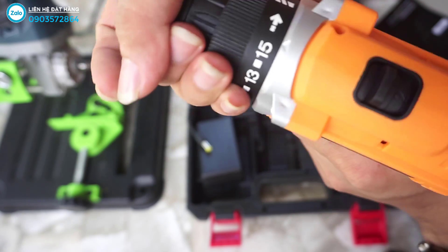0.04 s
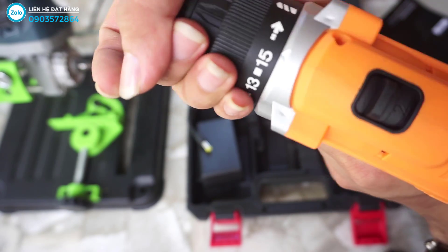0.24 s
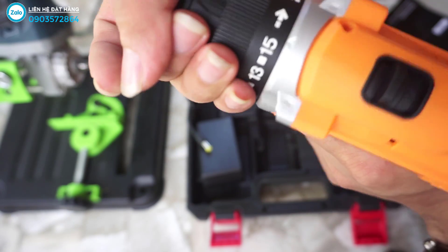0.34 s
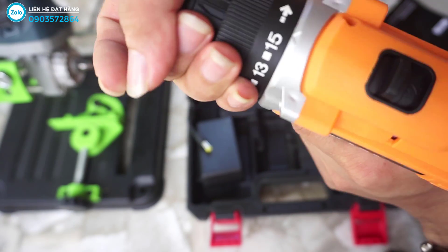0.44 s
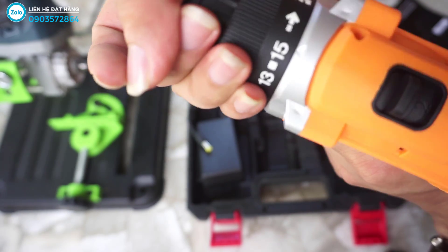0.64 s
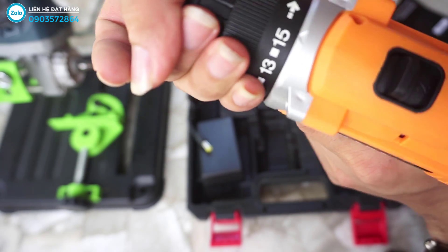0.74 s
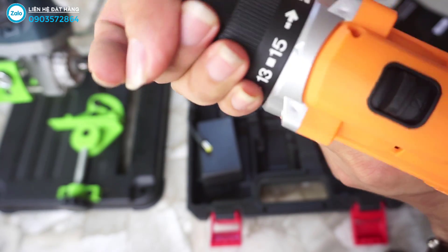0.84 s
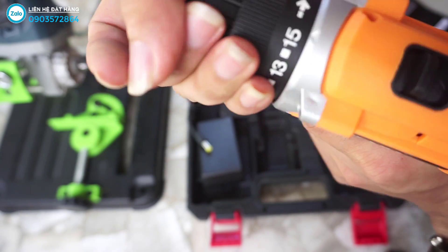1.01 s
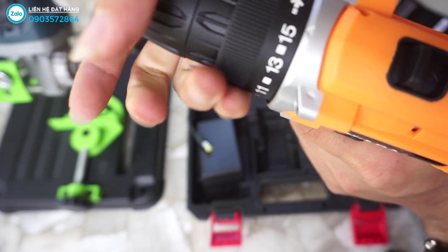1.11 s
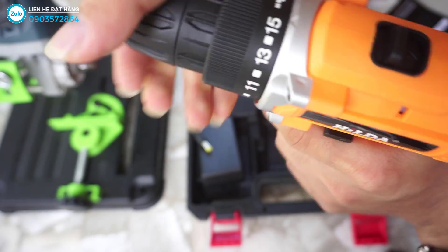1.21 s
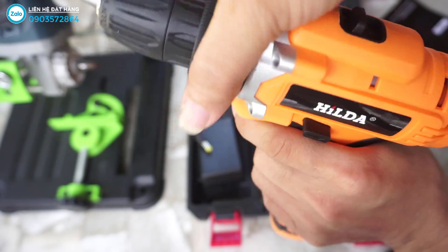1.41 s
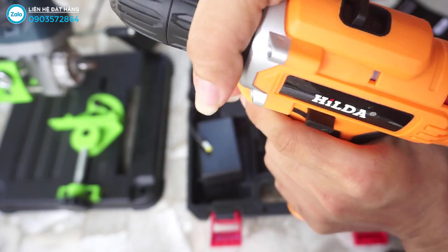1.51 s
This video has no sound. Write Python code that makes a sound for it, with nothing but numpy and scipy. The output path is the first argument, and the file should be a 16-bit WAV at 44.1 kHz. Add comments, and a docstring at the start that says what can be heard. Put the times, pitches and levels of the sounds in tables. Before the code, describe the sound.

Three brief bursts from a half-stalled cordless drill, squealing and clicking close by.

```python
"""A cordless drill, close to a stereo microphone in a small room and a little to the right,
is nudged three times while a hand grips its chuck. The half-stalled motor squeals at its switching
rate, the gears grind and knock, the brushes hiss and the clutch snaps. On the third pull the motor
briefly spins up with a gear whine and stops. Then the hand shifts its grip with a faint rustle and
ticks of plastic. Behind the drill lie a short room tail, quiet air and a low hum."""
import sys
import numpy as np
from scipy import signal
from scipy.fft import rfft, irfft, next_fast_len
from scipy.io import wavfile
from scipy.ndimage import uniform_filter1d, map_coordinates

SR = 44100
rng = np.random.default_rng(int(sys.argv[2]) if len(sys.argv) > 2 else 0)


def wav_record(signal):
    """Record a signal, one row per channel, as 16-bit PCM in the file named by sys.argv[1]."""
    frames = np.transpose(np.atleast_2d(signal))
    bounded = np.clip(frames, -1, 1)
    # unit amplitude maps onto the largest positive 16-bit level
    quanta = np.round(bounded * 32767).astype(np.int16)
    wavfile.write(sys.argv[1], SR, quanta)


N = 68355

# Colour of the room air. Each row: frequency in Hz, relative level in dB.
AIR_SPECTRUM = [(25, -26.5), (80, -28), (150, -14), (240, -16), (320, -8), (390, -6.5), (450, -11.5),
                (650, -10.5), (1100, -18.5), (1800, -18), (2700, -18.5), (3000, -13.5), (3500, -22),
                (4500, -23), (11000, -32.5)]
# The air sinks at the end. Each row: time in seconds, level in dB.
AIR_LEVELS = [(1.0, -52), (1.15, -57.5)]
# Low hum in the room. Each row: frequency in Hz, level in dB.
HUM_TONES = [(156, -73), (392, -64)]
# How alike noise is on both sides of the microphone. Each row: frequency in Hz, correlation.
STEREO_LIKENESS = [(60, 0.9), (350, 0.87), (2000, 0.32), (4800, 0.057), (10000, 0.022)]
# The room's tail. Each row: frequency in Hz, seconds to fall 60 dB.
ROOM_DECAY = [(200, 0.51), (1500, 0.34), (4000, 0.23), (10000, 0.22)]
# Plastic ticking under the fingers. Each row: start in seconds, level in dB, pitch in Hz,
# seconds for the crack to fall 60 dB.
GRIP_TICKS = [(.0553, -35.5, 7540, 0.035), (.4338, -35, 7800, 0.015), (1.0735, -33, 5860, 0.011),
              (1.0938, -35.5, 4400, 0.023), (1.139, -41, 7240, 0.0091), (1.1595, -38, 9700, 0.024),
              (1.184, -41, 2350, 0.044), (1.1895, -35.5, 2110, 0.015), (1.2, -41.5, 2230, 0.029),
              (1.207, -35.5, 2420, 0.012)]
# Hard clutch snaps. Each row reads as for the grip ticks.
CLUTCH_SNAPS = [(.2183, -16, 4540, 0.0019), (.2193, -18, 2090, 0.0093), (.32, -14, 4900, 0.0039),
                (.3103, -18.5, 10400, 0.0031), (.3478, -20, 6030, 0.0017), (.6228, -23.5, 5160, 0.0066),
                (.6406, -12, 5705, 0.0019), (.873, -20.5, 4714, 0.0074)]
# Resonances of the gearbox. Each row: frequency in Hz, level in dB, seconds to fall 60 dB.
GEARBOX_MODES = [(720, -5, .026), (990, -3, .022), (1470, -8, .011)]
# Gear teeth knocking. Each row: start in seconds, level in dB.
TOOTH_KNOCKS = [(.0099, -31), (.0161, -32), (.0212, -34), (.0271, -33), (.0321, -33), (.052, -33),
                (.1968, -31), (.2188, -18), (.2312, -22), (.238, -29), (.2467, -25), (.2557, -30),
                (.2688, -29), (.2997, -24), (.3126, -28), (.32, -26), (.3271, -29), (.3533, -23),
                (.3925, -30), (.3982, -26), (.4031, -29), (.535, -25), (.5451, -27), (.5536, -31),
                (.564, -28), (.5737, -27), (.5842, -28), (.5939, -31), (.5998, -29), (.6096, -23),
                (.6339, -21), (.645, -18), (.6522, -20), (.6592, -22), (.6661, -22), (.6719, -21),
                (.6776, -19), (.683, -18), (.6877, -20), (.6959, -27), (.705, -23), (.7151, -27),
                (.7207, -30), (.7251, -30), (.7317, -29), (.8291, -29), (.8538, -28), (.8623, -23),
                (.867, -18), (.8745, -18), (.8814, -19), (.8859, -15)]
# Hollow jolts as the gear train takes up its load. Each row: start in seconds, level in dB.
LOAD_JOLTS = [(0.2205, -25.5), (0.5345, -26.5)]
# The drive's grinding and hiss, then, from 1 s on, faint rustle as the hand shifts its grip.
# Each row: time in seconds, coarse noise in dB, fine noise in dB.
DRIVE_AND_RUSTLE_LEVELS = [(0, -38.5, -53), (.03, -37.5, -40.5), (.085, -58.5, -67), (.193, -64, -96),
                           (.198, -41.5, -99), (.225, -34, -44), (.28, -47, -62), (.31, -36, -36),
                           (.337, -57, -76), (.402, -35, -38.5), (.45, -67, -62.5), (.526, -62, -60),
                           (.532, -42, -36.5), (.595, -37.5, -62), (.635, -38, -36), (.685, -31.5, -32),
                           (.71, -38.5, -45), (.74, -41, -45), (.775, -67, -87), (.826, -54, -71),
                           (.83, -43, -33.5), (.858, -31.5, -57), (.875, -26.5, -23), (.91, -25, -29),
                           (.935, -28, -23.5), (.966, -26.5, -25.5), (.985, -38, -33), (1.0, -50, -51),
                           (1.1, -58.5, -58), (1.275, -65.5, -55.5), (1.31, -70, -67), (1.5, -82, -65),
                           (1.53, -66.5, -58)]
# Colours of the coarse and the fine noise. Each row: frequency in Hz, relative level in dB.
COARSE_SPECTRUM = [(100, -56), (300, -19), (500, -16.5), (680, -5.5), (1000, -3), (1550, -0.5),
                   (2300, -7.5), (2750, -8.5), (3200, 2.5), (4000, -10.5), (8000, -18.5)]
FINE_SPECTRUM = [(1000, -7), (3000, 0), (4400, 2.5), (5500, 0.5), (7000, 0), (8200, 0), (10000, 3.5),
                 (11200, -2.5)]
# The spin-up and stop. Each row: time in seconds, gear mesh rate in Hz, whine level in dB.
SPIN_UP = [(.878, 400, -48), (.89, 500, -37), (.9, 600, -36), (.911, 725, -29.5), (.922, 820, -33),
           (.935, 875, -34), (.952, 908, -39), (.962, 835, -36.5), (.97, 690, -38), (.984, 350, -46),
           (.993, 200, -60)]
# Harmonics of the mesh rate, from the first upward. Each entry: relative level in dB.
MESH_HARMONICS = [-15, -12, -1.5, -20, 2, -23]
# How the case passes the whine. Each row: frequency in Hz, gain in dB.
CASE_RESPONSE = [(400, -16), (700, 9), (1200, 8), (1650, 7), (2300, 6), (2750, -4), (3700, -18), (4400, -1),
                 (5600, -22)]
# Trigger pulls. Each row: press in seconds, release in seconds.
TRIGGER_PULLS = [(.1967, .383), (.5297, .704), (.8287, .9)]
# The squeal jumps as the rotor creeps on. Each row: start in seconds, pitch in Hz, level in dB.
ROTOR_STEPS = [(.19, 3171, -29.5), (.221, 3260, -40), (0.237, 3057, -30), (0.244, 3301, -33),
               (0.275, 3030, -27), (0.29, 3317, -33), (.355, 3003, -31.5), (0.361, 3210, -35.5),
               (0.374, 3170, -33), (0.552, 3310, -32), (.561, 3092, -27.5), (.566, 3300, -33),
               (0.579, 3030, -25), (.585, 3315, -30), (.606, 2960, -26), (.633, 3230, -31.5),
               (0.653, 2986, -31), (0.681, 3230, -34.5), (0.821, 3165, -30.5), (0.843, 3320, -37),
               (.848, 3104, -31), (0.854, 3283, -30.5), (0.865, 2990, -23), (0.869, 3322, -37),
               (0.878, 2960, -24), (0.886, 3282, -40)]
# How the motor housing passes the squeal's partials. Each row: frequency in Hz, gain in dB.
HOUSING_RESPONSE = [(3500, 2), (5900, -16), (6300, -18), (6650, -14), (9000, -23), (9500, -15.5),
                    (10000, -17.5)]


def amp(db):
    """Decibels to gain."""
    return 10 ** (np.asarray(db) / 20)


def pan(db):
    """Left and right gains for a left-minus-right level; negative sits to the right."""
    return amp(np.array([[db], [-db]]) / 2)


def along(points, hz):
    """Read (Hz, value) points at hz, on a log frequency axis."""
    freqs, values = np.transpose(points)
    return np.interp(np.log(hz + 1), np.log(freqs + 1), values)


def curves(rows):
    """One value per sample for each column after the time."""
    times, *columns = np.transpose(rows)
    return [np.interp(np.arange(N) / SR, np.sort(times), column) for column in columns]


def wobble(rate):
    """A smooth random curve, rate knots a second."""
    return map_coordinates(rng.standard_normal(N // 10), [np.arange(N) * rate / SR], mode="wrap")


def filtered(x, response):
    """Shape x with a gain that is a function of frequency."""
    size = next_fast_len(N + SR // 2)
    return irfft(rfft(x, size) * response(np.fft.rfftfreq(size, 1 / SR)), size)[..., :N]


def add(track, start, sound):
    """Mix a sound into the track, start seconds in."""
    part = track[..., round(start * SR):][..., :sound.shape[-1]]
    part += sound[..., :part.shape[-1]]


def rush(spectrum, envelope=1):
    """Coloured stereo noise of rms 1, nearly mono in the bass."""
    def mid_side_gains(hz):
        spread = np.arccos(np.clip(along(STEREO_LIKENESS, hz), -1, 1)) / 2
        return amp(along(spectrum, hz)) * [np.cos(spread), np.sin(spread)]

    mid, side = filtered(rng.standard_normal((2, N)) * envelope, mid_side_gains)
    stereo = np.array([mid + side, mid - side])
    return stereo / np.sqrt(np.mean(stereo ** 2) + 1e-20)


def grains(rate, life_s, bed):
    """Envelope of unevenly spaced tiny contacts on a steady bed."""
    count = np.floor(np.cumsum(rate * np.exp(.5 * wobble(rate))) / SR)
    hits = np.diff(count, prepend=0) * rng.uniform(.9, 1, N)
    return bed + signal.lfilter([1], [1, -np.exp(-1 / (life_s * SR))], hits)


def clicks(rows, ring_ratio, crack_db, crack_low_hz):
    """Dry clicks: a crack of noise and a ring that lasts ring_ratio times as long."""
    out, t = np.zeros((2, N)), np.arange(SR // 30) / SR
    highpass = signal.butter(2, crack_low_hz, "high", fs=SR)
    for start, db, hz, t60 in rows:
        noise = rng.standard_normal(len(t)) + .5 * rng.standard_normal((2, len(t)))
        crack = signal.lfilter(*highpass, noise * amp(crack_db - 60 * t / t60))
        ring = np.sin(2 * np.pi * hz * t) * amp(-60 * t / (ring_ratio * t60))
        add(out, start, amp(db) * (ring + crack))
    return out


def room_tone():
    """Quiet air all round the microphone, with a low hum in the middle."""
    t = np.arange(N) / SR
    air_db, = curves(AIR_LEVELS)
    hum = sum(amp(db) * np.sqrt(2) * np.sin(2 * np.pi * hz * t + .5 * wobble(10.63))
              for hz, db in HUM_TONES)
    return amp(air_db) * rush(AIR_SPECTRUM) + hum


def room_tail(source):
    """The walls of the small room return a short tail; the treble dies first."""
    hz, t, noise = signal.stft(rng.standard_normal((2, SR // 2)), SR, nperseg=256)
    decay = amp(-60 * t / along(ROOM_DECAY, hz)[:, None])
    _, tail = signal.istft(noise * decay, SR, nperseg=256)
    tail /= np.linalg.norm(tail[0])
    return signal.fftconvolve(source.mean(axis=0)[None], tail, axes=1)[:, :N]


def grip_ticks():
    """The plastic gives small ticks under the fingers."""
    return clicks(GRIP_TICKS, ring_ratio=.27, crack_db=-5, crack_low_hz=1800)


def clutch_snaps():
    """The clutch snaps, hard and short at this distance."""
    return clicks(CLUTCH_SNAPS, ring_ratio=.67, crack_db=-1.5, crack_low_hz=1430)


def gearbox_ring(t):
    """One ring of the gearbox, tuned a little differently each time."""
    return sum(amp(db - 60 * t / t60) * np.sin(2 * np.pi * hz * rng.normal(1, .05) * t)
               for hz, db, t60 in GEARBOX_MODES)


def gear_knocks():
    """Each tooth taking up its slack gives a tick that falls in pitch; jolts ring the whole gearbox."""
    out, t = np.zeros(N), np.arange(SR // 30) / SR
    high_hz, low_hz, glide_s = 4820, 1060, .00036
    attack_s, ring_db = .00027, -14.5
    hz = low_hz + (high_hz - low_hz) * np.exp(-t / glide_s)  # the treble arrives first
    envelope = t / attack_s * np.exp(1 - t / attack_s)
    for start, db in TOOTH_KNOCKS:
        cycles = np.cumsum(hz) * rng.normal(1, .12) / SR + rng.random()
        tick = envelope * np.sin(2 * np.pi * cycles)
        add(out, start, amp(db) * (tick + amp(ring_db) * gearbox_ring(t)))
    for start, db in LOAD_JOLTS:
        add(out, start, amp(db) * gearbox_ring(t))
    return out * pan(db=-4)


def drive_and_rustle():
    """Dense small contacts: the drive's grinding and hiss, then faint rustle as the grip shifts."""
    coarse_db, fine_db = curves(DRIVE_AND_RUSTLE_LEVELS)
    coarse = rush(COARSE_SPECTRUM, grains(rate=450, life_s=.0006, bed=.3)) * amp(coarse_db)
    fine = rush(FINE_SPECTRUM, grains(rate=930, life_s=.00017, bed=.19)) * amp(fine_db)
    return coarse * pan(db=-6.5) + fine * pan(db=-1.5)


def gear_whine():
    """The gear mesh glides up and down with the motor's speed, through the resonances of the case."""
    t = np.arange(N) / SR
    mesh_hz, db = curves(SPIN_UP)
    phase = 2 * np.pi * np.cumsum(mesh_hz * (1 + .024 * wobble(700))) / SR
    tone = np.zeros(N)
    for k, harmonic_db in enumerate(MESH_HARMONICS, 1):
        gain = amp(harmonic_db + along(CASE_RESPONSE, k * mesh_hz) + 2.5 * wobble(220))
        tone += gain * np.sin(k * phase)
    spinning = (t > SPIN_UP[0][0]) & (t < SPIN_UP[-1][0])
    return tone * amp(db) * spinning * pan(db=-14.5)


def motor_squeal():
    """The windings sing at the switching rate; pitch and level jump with the rotor's position."""
    waver_db, pitch_jitter = .9, .005
    overtone_waver_db, overtone_smear_rad = 5, .15
    t = np.arange(N) / SR
    steps = np.array(ROTOR_STEPS)
    step_index = np.maximum(np.searchsorted(steps[:, 0], t) - 1, 0)
    hz, db = uniform_filter1d(steps[step_index, 1:].T, size=45)
    trigger = sum(((t > on) & (t < off)) * 1. for on, off in TRIGGER_PULLS)
    level = uniform_filter1d(trigger, size=24) * amp(db + waver_db * wobble(138.1))
    phase = 2 * np.pi * np.cumsum(hz * (1 + pitch_jitter * wobble(500))) / SR
    phase = phase + np.array([[0], [.6]])  # the right channel leads
    tone = np.zeros((2, N))
    for k in (1, 2, 3):
        flicker_db = (k > 1) * overtone_waver_db * wobble(85.3)
        smear = (k - 1) * overtone_smear_rad * wobble(900)
        tone += amp(along(HOUSING_RESPONSE, k * hz) + flicker_db) * np.sin(k * phase + smear)
    return level * tone * pan(db=-6)


def scene():
    """The drill close up and a little to the right, with the room well behind it."""
    bass_cut_hz, room_db = 464, -11.5
    snaps, ticks = clutch_snaps(), grip_ticks()
    drill = motor_squeal() + drive_and_rustle() + gear_whine() + gear_knocks() + snaps + ticks
    # the small case radiates little bass
    drill = signal.lfilter(*signal.butter(2, bass_cut_hz, "high", fs=SR), drill)
    return drill + amp(room_db) * room_tail(drill) + room_tone()


def record(dry):
    """The microphone's signal is cut off steeply at the top of its band."""
    top_hz = 11130
    return filtered(dry, lambda hz: 1 / np.sqrt(1 + (hz / top_hz) ** 220))


dry = scene()
out = record(dry)
wav_record(out)
```